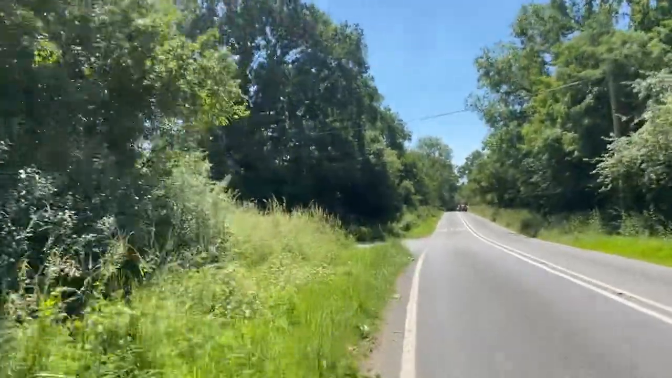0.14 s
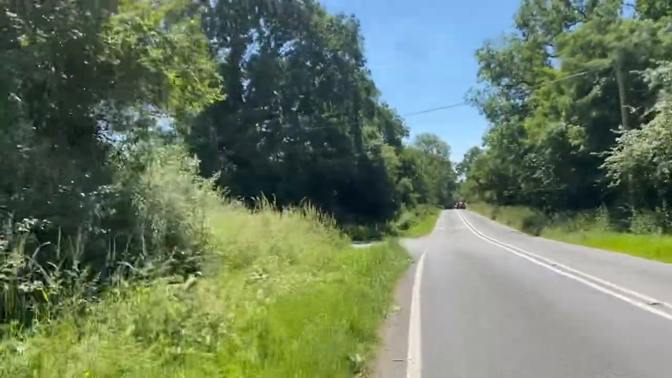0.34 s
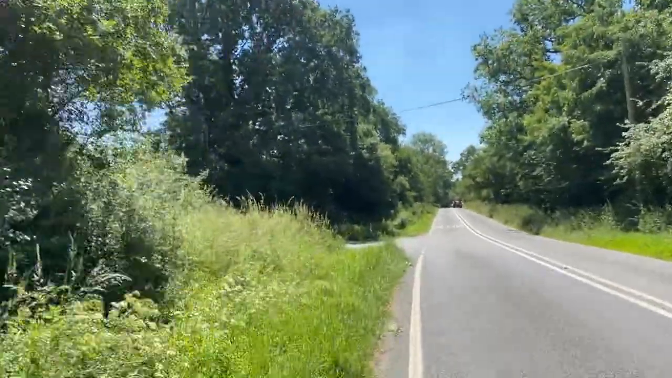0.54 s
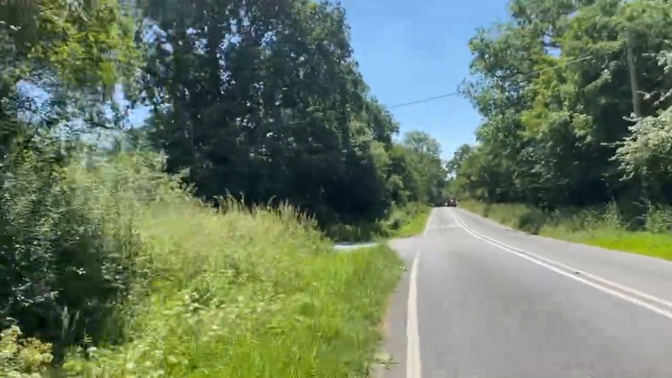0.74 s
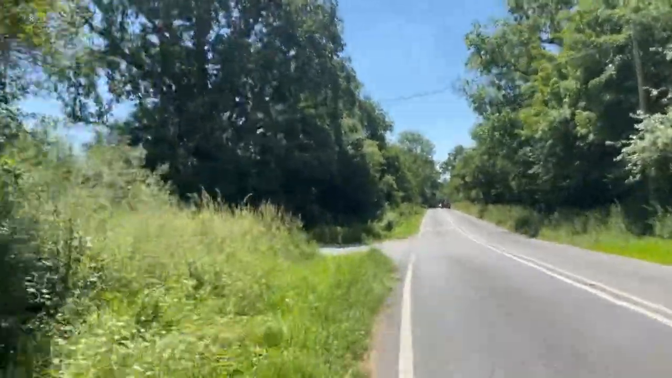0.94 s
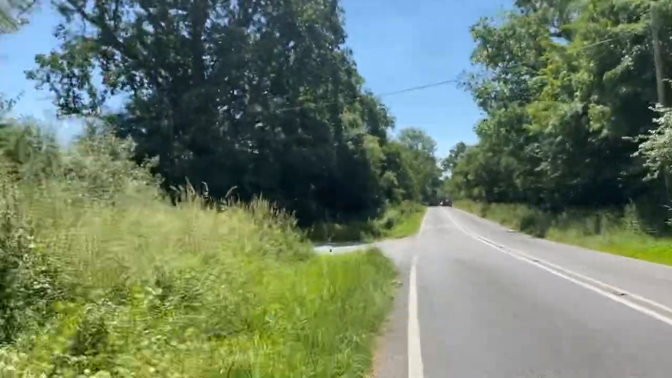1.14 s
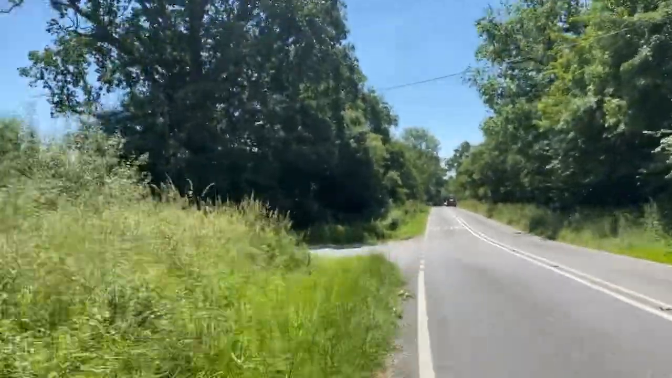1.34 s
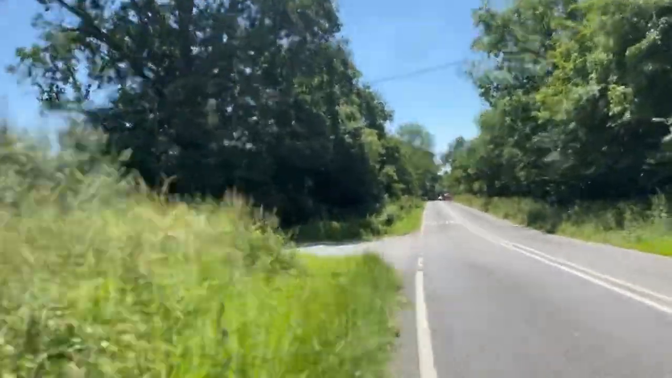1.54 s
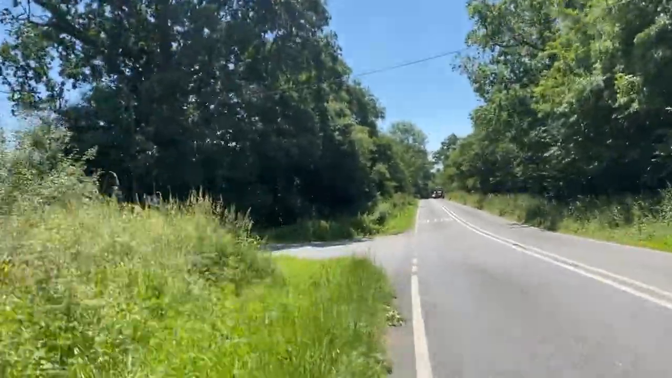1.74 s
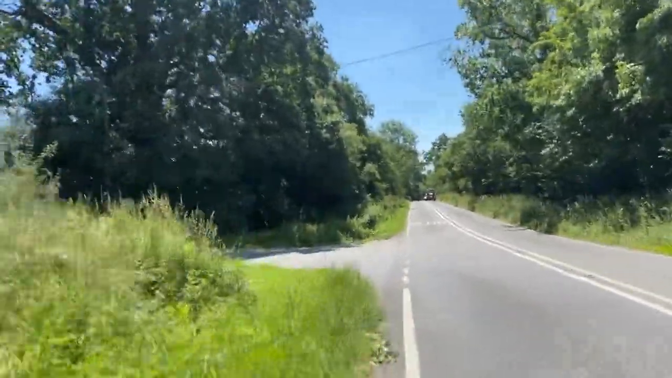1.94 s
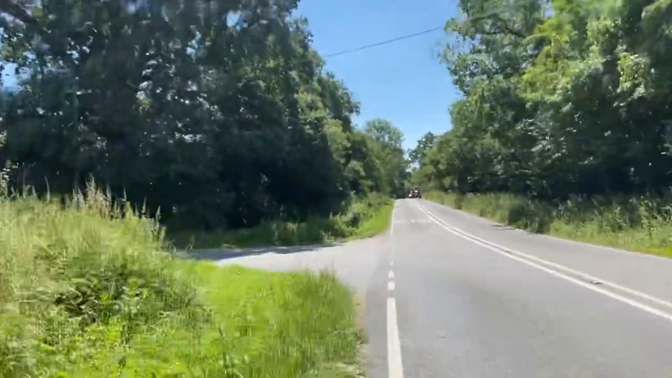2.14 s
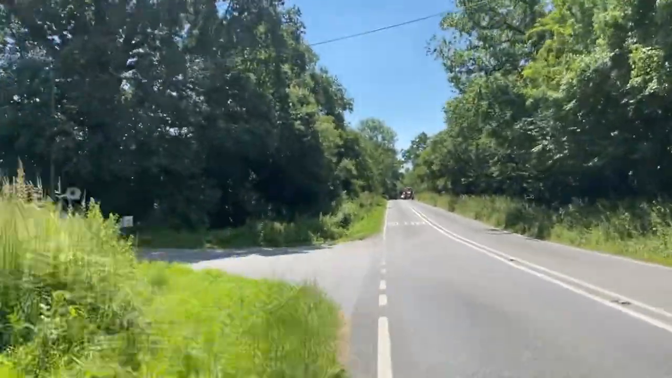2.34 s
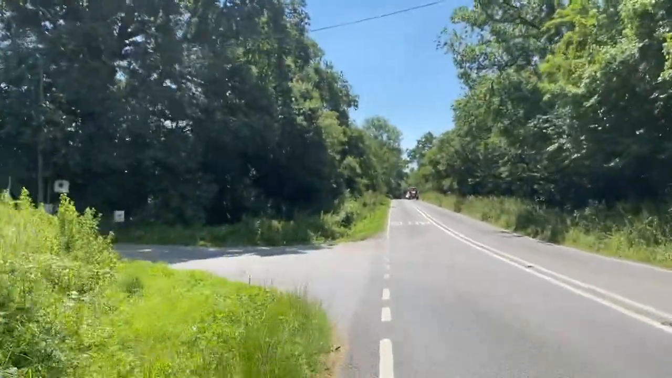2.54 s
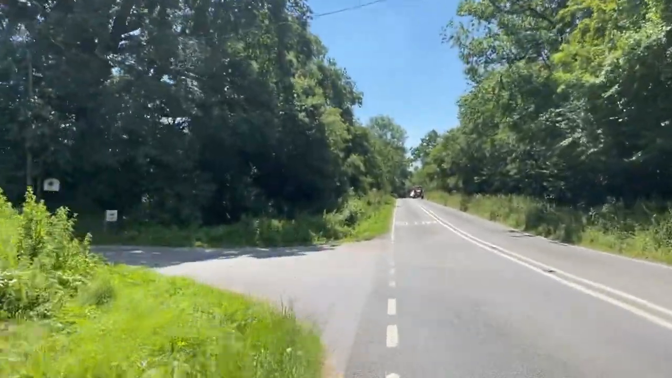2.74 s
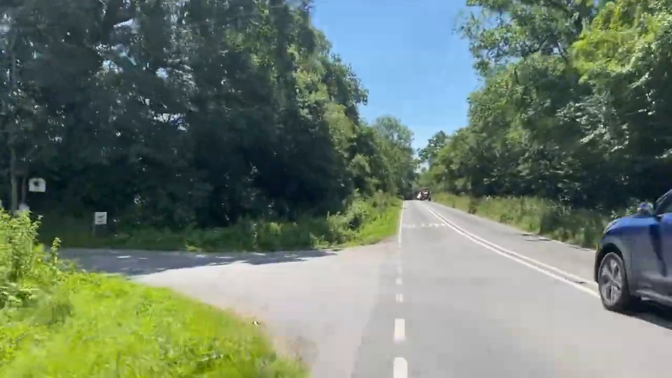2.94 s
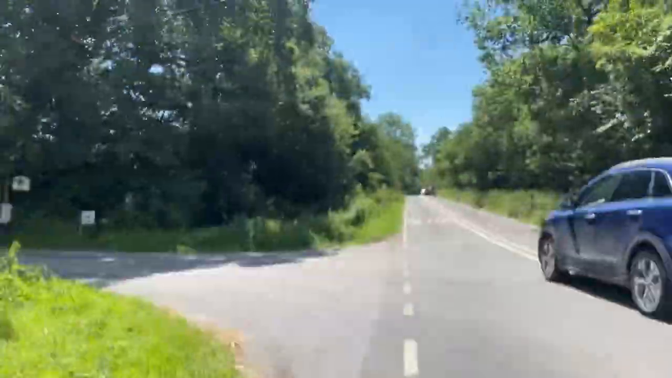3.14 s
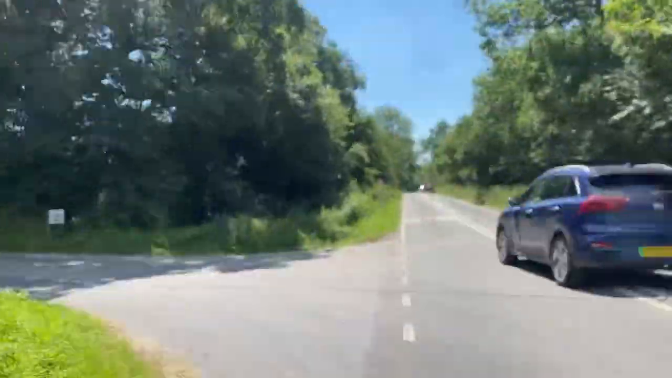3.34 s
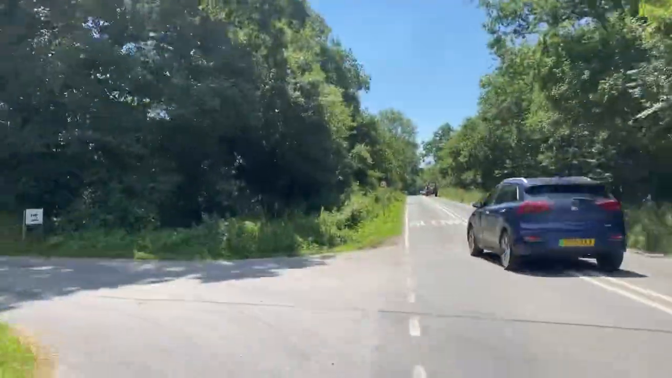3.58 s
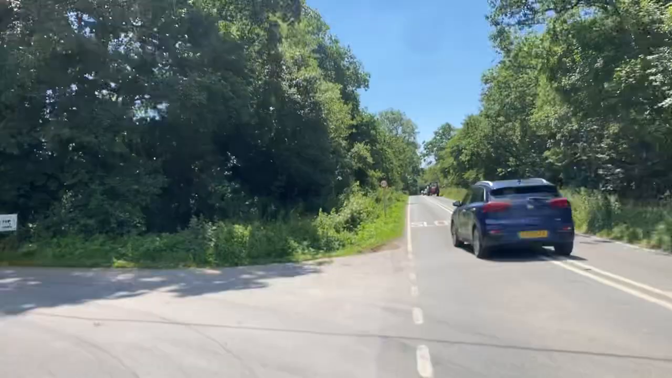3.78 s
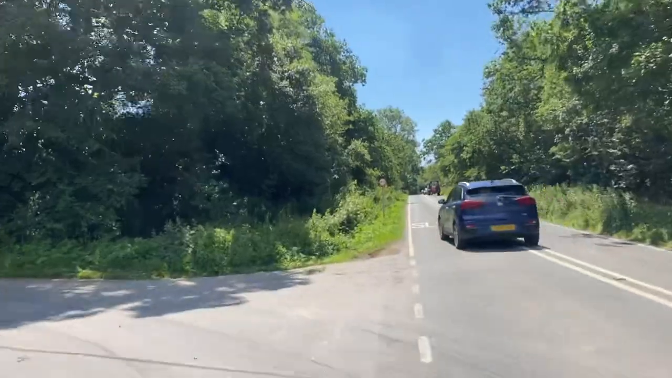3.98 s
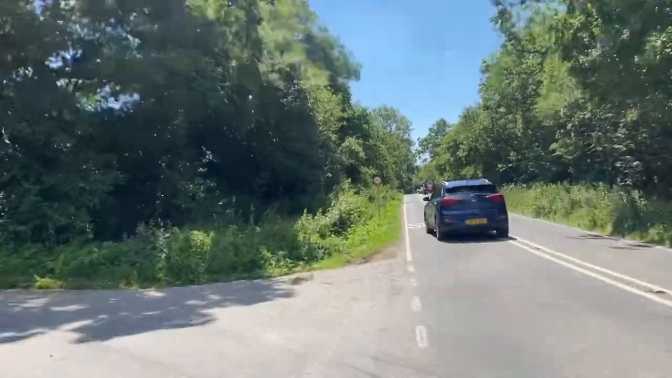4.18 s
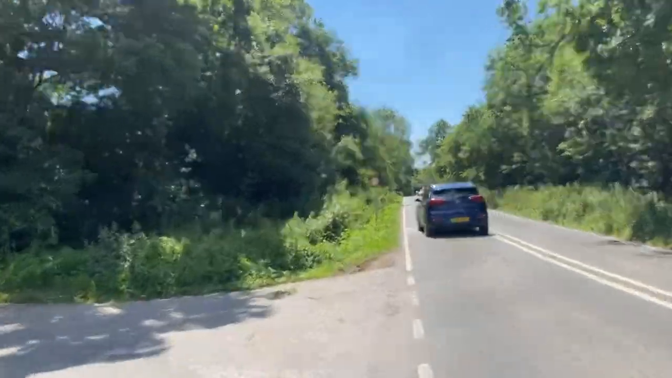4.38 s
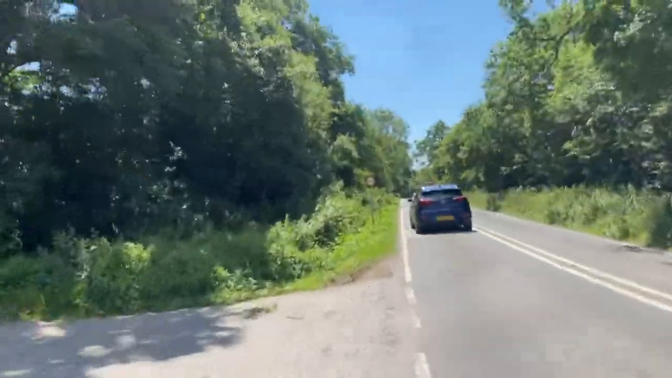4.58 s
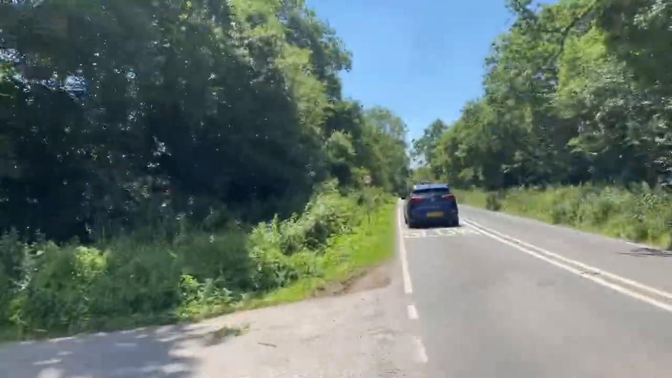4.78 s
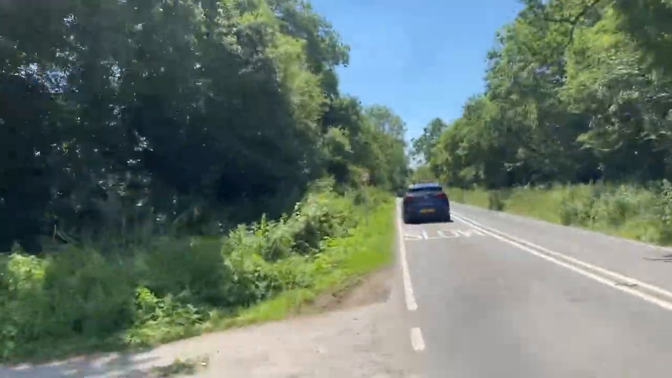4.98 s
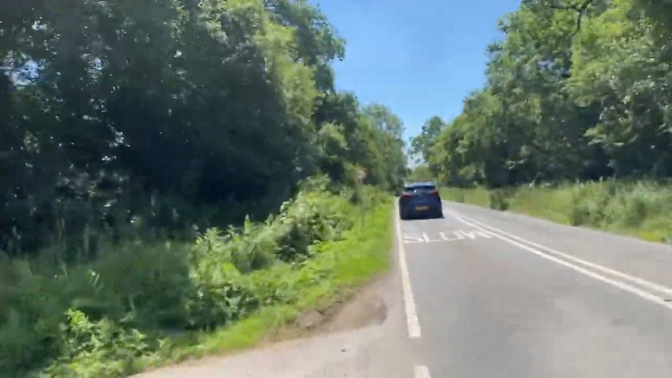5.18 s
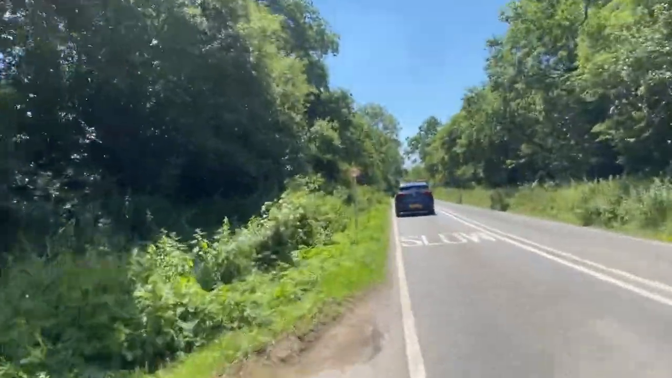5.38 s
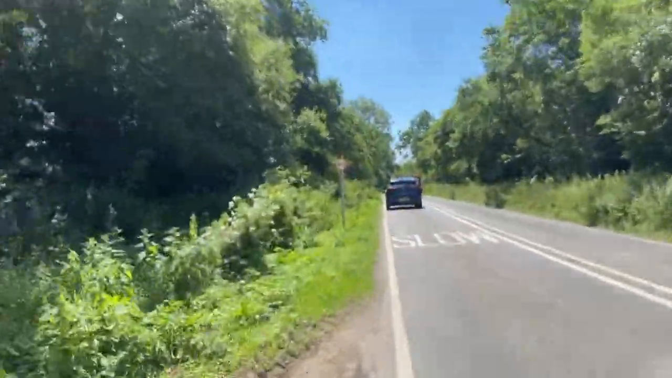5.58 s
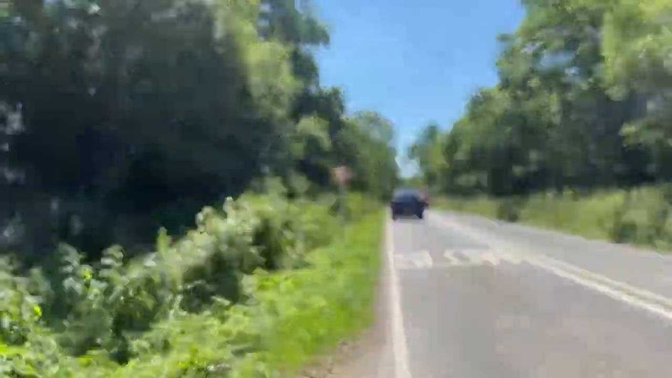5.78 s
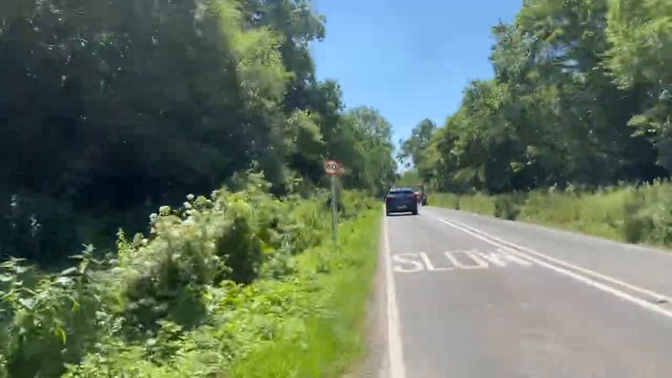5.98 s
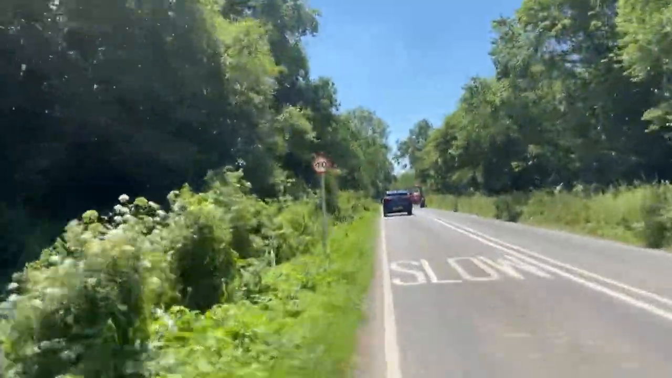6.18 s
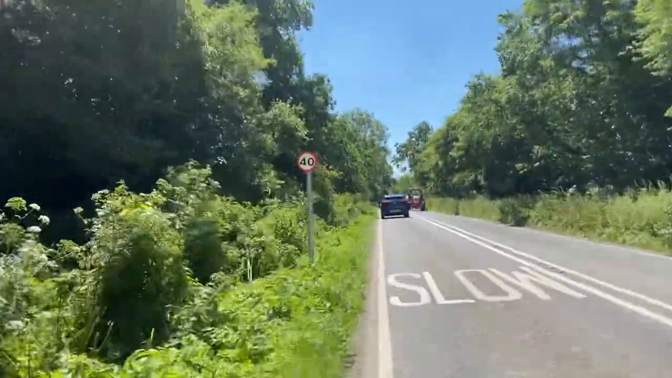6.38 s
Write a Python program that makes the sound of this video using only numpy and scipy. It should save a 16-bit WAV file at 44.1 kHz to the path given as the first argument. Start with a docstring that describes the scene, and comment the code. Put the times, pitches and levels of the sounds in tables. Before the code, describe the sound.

A stereo microphone on a moving bicycle, on an open country road. At first there is the quiet, steady rush of the bicycle's tyres, a little low wind, and a car's tyre roar growing from behind on the right. Faint bright ticks of a loose part begin around 0.6 s, and dull thuds land near 1.65 and 1.84 s. The car draws level at about 2.3 s, its broadband roar full and increasingly hissy, while deep, lumpy wind buffeting peaks around 2.4 s. From 2.9 to 3.5 s thumps and a dense rattle of clicks follow as the tyres pull ahead, moving towards the centre with a broad tread note near 1 kHz. The roar eases gradually. Gusts thump near 4.07 and 5.05-5.25 s; ticks cluster again at 5.4-5.9 s, a harder knock rings at 6.05 s, and wind rises slightly at the end.

```python
"""On a country road a car overtakes a bicycle, heard from the bicycle.
Its tyres are coloured noise: they roar up from behind on the right, hiss alongside and recede ahead
with a broad tread note near 1 kHz. The bicycle's own tyres are a steady, quiet noise.
Air buffets the microphone ports as lumpy noise, strongest around the car's pass, with thumps as short swings.
Loose parts of the bicycle rattle over bumps: small clicks that ring resonances."""
import sys
import numpy as np
from scipy import signal
from scipy.fft import rfft, irfft, next_fast_len
from scipy.io import wavfile
from scipy.ndimage import uniform_filter1d

SR = 44100
rng = np.random.default_rng(int(sys.argv[2]) if len(sys.argv) > 2 else 0)


def transcribe(signal):
    """Save signal, clipped to [-1, 1], as a 16-bit WAV file at the path in sys.argv[1]."""
    frames = np.atleast_2d(signal).T
    limited = np.clip(frames, -1, 1)
    pcm = np.round(limited * 32767).astype(np.int16)
    wavfile.write(sys.argv[1], SR, pcm)


N = 283122
TIME = np.arange(N) / SR
FRAME = 1024   # samples in one short slice of sound
OVERLAP = FRAME * 3 // 4
FRAME_HZ, FRAME_S, _ = signal.stft(TIME, SR, nperseg=FRAME, noverlap=OVERLAP)
HZ_COLUMN = FRAME_HZ[:, None]


def from_db(db):
    """Decibels to gain."""
    return 10 ** (np.asarray(db) / 20)


def rms_one(x):
    """Scale to unit power."""
    return x / np.sqrt(np.mean(x ** 2) + 1e-20)


def in_time(rows, at):
    """Read each column of a time curve at the given times."""
    s, *columns = np.transpose(rows)
    return [np.interp(at, s, column) for column in columns]


def at_hz(points, hz):
    """Read a spectrum with straight lines between its points on a log-frequency axis."""
    known_hz, values = np.transpose(points)
    return np.interp(np.log(hz + 1), np.log(known_hz), values)


def by_frequency(table):
    """Read each column of a table at the frame frequencies."""
    rows = np.array(table)
    return np.array([at_hz(rows[:, [0, k]], HZ_COLUMN) for k in range(1, rows.shape[1])])


def shares(control, marks):
    """Cross-fade weights of a control between its marks."""
    return [np.interp(control, marks, one) for one in np.eye(len(marks))]


def blend(parts, weights):
    """Mix several values or spectra by weights that change in time."""
    return sum(weight * part for weight, part in zip(weights, parts))


def panned(left_right_db):
    """Left and right gains of constant total power; positive is louder on the left."""
    gains = from_db([left_right_db / 2, -left_right_db / 2])
    return gains / np.sqrt(np.mean(gains ** 2, axis=0))


def drift(rate):
    """Smooth random wandering of spread 1 that changes about rate times a second."""
    hz = np.fft.rfftfreq(N, 1 / SR)
    spectrum = rfft(rng.standard_normal(N)) / (1 + (hz / rate) ** 2)
    return rms_one(irfft(spectrum, N))


def pair(mid, side, likeness):
    """Mix two unrelated noises into a left and a right of a given likeness."""
    likeness = np.clip(likeness, 0, .99)
    mid = np.sqrt(1 + likeness) * mid
    side = np.sqrt(1 - likeness) * side
    return np.array([mid + side, mid - side]) / np.sqrt(2)


def coloured(spectrum, likeness):
    """Stereo noise with a given spectrum, scaled to unit power."""
    size = next_fast_len(N)
    gain = from_db(at_hz(spectrum, np.fft.rfftfreq(size, 1 / SR)))
    mid, side = irfft(rfft(rng.standard_normal((2, size))) * gain, size)[:, :N]
    return rms_one(pair(mid, side, likeness))


# the pass: the car draws level while it cuts back into line ahead
ABREAST_S, OVERTAKE_M_PER_S = 2.276, 3.86
CAR_SIDE_M = 2.02   # the car's middle from the bicycle, before it cuts in
CUT_IN_S, CUT_IN_TAKES_S = 2.25, 2.35


def car_position(at):
    """Metres the car is ahead, and the sine of its bearing: 0 = in line with the road, 1 = abreast."""
    ahead_m = OVERTAKE_M_PER_S * (at - ABREAST_S)
    cut_in = np.clip((at - CUT_IN_S) / CUT_IN_TAKES_S, 0, 1)
    side_m = CAR_SIDE_M * np.cos(np.pi / 2 * cut_in) ** 2
    return ahead_m, side_m / np.hypot(side_m, ahead_m)


WHEEL_SIDE_M, WHEELBASE_M = 1.73, 3.34   # near wheels from the bicycle; axle to axle
# the wedge between tyre and road beams the roar backwards; the width is a sine of the angle
HORN_DB, HORN_WIDTH = 5.5, 0.16
FAR_BEHIND_DB_PER_M = 0.63   # the rider's body screens the approaching car


def travel_db(ahead_m, sideways):
    """Front and rear tyres each fall off with distance, and beam their roar straight back."""
    power = sum(1 / (WHEEL_SIDE_M ** 2 + (ahead_m + end * WHEELBASE_M / 2) ** 2) for end in (-1, 1))
    horn_db = HORN_DB * np.exp(-(sideways / HORN_WIDTH) ** 2) * (ahead_m > 0)
    return 10 * np.log10(power) + horn_db + FAR_BEHIND_DB_PER_M * np.minimum(ahead_m, 0)


def band_power(gain, low_hz, high_hz):
    """Power that unit white noise keeps in a band, frame by frame."""
    in_band = (FRAME_HZ > low_hz) & (FRAME_HZ < high_hz)
    return np.sum(gain[in_band] ** 2, axis=0) / len(FRAME_HZ)


# shape of the tyre noise from the car's nose, flank and tail, before levels are set:
# columns pitch_hz, relative_level_db (per Hz)
NOSE_SPECTRUM = [(30, -38), (100, -12), (240, 14), (370, 6), (500, 7.5), (700, 3.5), (1000, 4), (1300, -1),
                 (1700, -8), (2200, -27.5), (3200, -31.5), (5400, -43.5), (8400, -49.5), (11300, -46),
                 (13000, -60), (16000, -76)]
FLANK_SPECTRUM = [(30, -3), (100, -1), (240, 5), (450, -1.5), (780, 3.5), (1000, 0), (1270, -9.5),
                  (1800, -10.5), (2200, -12), (3000, -20.5), (4500, -29.5), (5700, -35), (7200, -36),
                  (8400, -35), (10700, -29.5), (12000, -43), (13000, -53), (16000, -69)]
TAIL_SPECTRUM = [(100, 1.5), (450, 6), (700, -12.5), (1050, -3), (1400, -14.5), (1900, -13.5),
                 (2600, -20.5), (3500, -28), (4700, -33.5), (6000, -44), (8400, -48), (10700, -45),
                 (12000, -55), (13000, -61), (16000, -77)]
# tread resonances heard from behind the car: columns pitch_hz, width_hz, lift_db (it wavers around this)
TREAD_NOTES = [(737, 192, 17.5), (1021, 158, 12), (1393, 192, 15), (1697, 68, 10)]


def tyre_colour(aspect, hiss_db, wander_db):
    """Gain by frequency and time: the colour turns with the car, and the tread notes stand out behind it."""
    tread_db = 0
    for centre_hz, width_hz, lift_db in TREAD_NOTES:
        wavering_db = wander_db * np.interp(FRAME_S, TIME, drift(40.0))
        tread_db = tread_db + (lift_db + wavering_db) / (1 + (2 * (HZ_COLUMN - centre_hz) / width_hz) ** 2)
    nose_db, flank_db = at_hz(NOSE_SPECTRUM, HZ_COLUMN), at_hz(FLANK_SPECTRUM, HZ_COLUMN)
    tail_db = at_hz(TAIL_SPECTRUM, HZ_COLUMN) + tread_db
    db = blend([nose_db, flank_db, tail_db], aspect)
    # air pumped out of the tread grooves sets how strong the hiss is over the roar
    shape = from_db(db)
    hiss_now_db = 10 * np.log10(band_power(shape, 2300, 4200) / band_power(shape, 700, 1800))
    hiss_share = at_hz([(1100, 0), (2200, 0.76), (5000, 1.0), (11000, 1.0)], HZ_COLUMN)
    gain = from_db(db + (hiss_db - hiss_now_db) * hiss_share)
    return gain / np.sqrt(band_power(gain, 700, 1800))


# bands that grow louder or softer, and change between left and right, as the car passes:
# columns ahead_m (car's place at the peak), reach_m, pitch_hz, width_octaves, level_db,
# left_right_db, left_lead_radians
PASSING_BANDS = [(-1, 0.62, 1430, 0.53, 6.5, 1, 0.073), (-1.5, 0.9, 2700, 0.47, 3, -6, -0.6),
                 (0.5, 0.52, 3000, 0.35, 2.5, -13, -0.074), (1, 1.5, 1200, 0.49, 2.5, 3, -0.64),
                 (1, 0.21, 1350, 0.23, -8, 4, 0.028), (1.4, 1.15, 2200, 0.72, -5.5, 0.5, 0.82),
                 (3, 1.3, 1980, 0.12, 3.5, 0.5, 0.31)]


def passing_bands(ahead_m):
    """Level, left-right difference and left lead of the bands that change as the car passes."""
    total = 0
    for at_m, reach_m, hz, octaves, *effects in PASSING_BANDS:
        in_place = ((ahead_m - at_m) / reach_m) ** 2
        in_pitch = (np.log2((HZ_COLUMN + 1) / hz) / octaves) ** 2
        total = total + np.multiply.outer(effects, np.exp(-in_place - in_pitch))
    return total


NOSE_M, TAIL_M = 3.4, 5.16   # this far behind only its nose is heard, this far ahead only its tail
FLANK_M = 0.87   # within this distance either way it shows its full flank
# SHADOW_DB is a left-right difference
SHADOW_HZ, SHADOW_SINK_OCTAVES_PER_M, SHADOW_OCTAVES, SHADOW_DB = 1950, 0.145, 0.2, -5


def shadow_db(ahead_m):
    """The shadow on the left port is a notch that sinks in pitch as the car slides past."""
    octaves = np.log2((HZ_COLUMN + 1) / SHADOW_HZ) + SHADOW_SINK_OCTAVES_PER_M * ahead_m
    alongside = np.interp(ahead_m, [-FLANK_M, 0, TAIL_M, 2 * TAIL_M], [0, 1, 1, 0])
    return SHADOW_DB * alongside * np.exp(-(octaves / SHADOW_OCTAVES) ** 2)


HISS_RISE_DB_PER_M = 4.5   # the tyres throw their hiss backwards, so it grows along the flank
PORT_LAG_S = 0.00029   # the left port hears a car abreast this much later
# starting roar of one tyre at 1 m, before all later level changes: nose_db, flank_db, tail_db
ROAR_DB = [-24, -19.5, -24]
# starting hiss relative to the roar, before later level changes: nose_db, flank_db, tail_db
HISS_OVER_ROAR_DB = [-21, -20.5, -15]
# small changes of the roar's level after the car has passed (the first one also holds before):
# columns time_s, change_db
ROAR_LEVEL = [(2.8, -1.8), (3.25, -2.5), (3.55, -1), (3.9, 0.5), (4.2, 0.2), (4.45, -1.5), (4.75, 1),
              (5.2, 0.4)]
# how alike the tyre noise is left and right: columns pitch_hz, likeness_0_to_1 (held to 0.99 at most)
TYRE_LIKENESS_BY_HZ = [(100, 0.46), (600, 0.89), (1000, 0.97), (1400, 0.86), (2400, 1), (3500, 0.52),
                       (6000, 0.19), (10500, 0.073)]
# left-right level difference, before passing bands and shadow: columns pitch_hz, nose_db, flank_db, tail_db
SIDE_SHADE = [(200, 0, -9, 6), (537, -9.5, -4, -6.5), (770, -9, -2.5, -8.5), (1070, -20, -5.5, -10.5),
              (1280, -8, -7, -6.5), (1440, -4.5, -4, -9.5), (1770, 0, -3, -6), (2200, -2, -2, -1),
              (3280, -0.5, 4.5, 1.5), (4600, -3, 1, 2), (8000, -4, 3.5, 4)]
# phase by which the left port leads, besides the port lag and the passing bands:
# columns pitch_hz, in_line_radians, slanting_radians, abreast_radians
LEFT_LEAD = [(102, 0.33, 1, 0.75), (300, -0.14, -0.56, -1.73), (600, -0.78, -2.1, -1.5),
             (806, -0.51, -1.3, -1.7), (950, 0.071, -1.4, -0.69), (1340, -0.12, -0.42, -0.69),
             (1520, 0.017, 0.66, -0.1), (1990, 0.05, 0.84, -0.13), (2660, -0.15, 0.81, -0.35),
             (3900, 0.62, -0.21, 0.87), (10500, -0.94, -0.86, -0.67)]


def car(slant, grain_db):
    """Tyre noise takes its level, colour and left-right timing from where the car is."""
    ahead_m, sideways = car_position(FRAME_S)
    nose, front_door, rear_door, tail = shares(ahead_m, [-NOSE_M, -FLANK_M, FLANK_M, TAIL_M])
    aspect = [nose, front_door + rear_door, tail]
    change_db, = in_time(ROAR_LEVEL, FRAME_S)
    roar_db = blend(ROAR_DB, aspect) + travel_db(ahead_m, sideways) + change_db
    # taking the change off again keeps it out of the hiss
    flank_hiss_db = HISS_RISE_DB_PER_M * FLANK_M * (rear_door - front_door)
    hiss_db = blend(HISS_OVER_ROAR_DB, aspect) - change_db + flank_hiss_db
    # patches of coarser and smoother asphalt make the noise flicker
    noise = rng.standard_normal((2, N)) * rms_one(from_db(grain_db * drift(9.0)))
    mid, side = signal.stft(noise, SR, nperseg=FRAME, noverlap=OVERLAP)[2]
    band_db, band_left_right_db, band_lead = passing_bands(ahead_m)
    left_right_db = blend(by_frequency(SIDE_SHADE), aspect) + shadow_db(ahead_m) + band_left_right_db
    likeness = at_hz(TYRE_LIKENESS_BY_HZ, HZ_COLUMN)
    left, right = pair(mid, side, likeness) * panned(left_right_db)
    lead = blend(by_frequency(LEFT_LEAD), shares(sideways, [0, slant, 1]))
    lead = lead - 2 * np.pi * HZ_COLUMN * PORT_LAG_S * sideways
    ports = np.array([left * np.exp(1j * (lead + band_lead)), right])
    ports = ports * tyre_colour(aspect, hiss_db, wander_db=1.1) * from_db(roar_db + band_db)
    return signal.istft(ports, SR, nperseg=FRAME, noverlap=OVERLAP)[1][:, :N]


# the bicycle's own tyres: columns pitch_hz, relative_level_db (per Hz)
ROLLING_SPECTRUM = [(100, -7), (500, -2), (1000, 7.5), (1650, 1), (2200, -4.5), (3500, -15), (6000, -22.5),
                    (8300, -21.5), (11000, -22.5), (12200, -26), (13000, -44), (16000, -55)]


def rolling():
    """The bicycle's tyres on the road make a steady, quiet noise."""
    return from_db(-47.5) * coloured(ROLLING_SPECTRUM, likeness=0.42)


# slowly changing strength of the wind over the ports, strongest around the car's pass;
# wind() trims both levels: columns time_s, buffeting_db, flutter_db
AIR_FLOW = [(0, -44, -36), (0.8, -34.5, -33.5), (1.5, -34, -40), (1.95, -25, -25.5), (2.35, -21.5, -24.5),
            (2.75, -22, -17), (3.25, -23.5, -32), (4.35, -25, -37), (4.65, -31.5, -41), (5.5, -34, -37),
            (6.42, -26, -26)]
# gusts on top of that wind, trimmed alike: columns time_s, buffeting_db, flutter_db
GUST_PEAKS = [(0.32, -34, -39), (0.45, -38, -36), (1.33, -45, -27), (1.67, -29, -45), (1.87, -25, -19),
              (2.2, -19.5, -27), (2.37, -13, -24), (2.509, -17.5, -32), (2.68, -19.5, -43),
              (2.949, -17.5, -20), (3.088, -23, -26), (3.419, -26, -28), (3.9, -42, -20.5),
              (4.069, -20, -27), (4.28, -24, -46), (4.39, -22.5, -26.5), (5.04, -23, -33),
              (5.238, -32, -19.5), (5.57, -40, -24), (5.716, -27, -22.5), (5.85, -39, -31),
              (6.22, -23, -23), (6.35, -27.5, -42)]
# time each side of a gust's peak in which its power falls to about a third: buffeting_s, flutter_s
GUST_FALL_S = [0.03, 0.028]


def air_flow():
    """Strength of buffeting and of flutter: the slowly changing wind and the gusts add in power."""
    power = from_db(in_time(AIR_FLOW, TIME)) ** 2
    for s, *levels_db in GUST_PEAKS:
        near = np.abs(TIME - s) < .2
        for kind, (db, fall_s) in enumerate(zip(levels_db, GUST_FALL_S)):
            power[kind, near] += from_db(db) ** 2 * np.exp(-((TIME[near] - s) / fall_s) ** 2)
    return np.sqrt(power)


def evened(x, seconds):
    """Take the slow swells out of a noise and keep its fast lumps."""
    local_power = uniform_filter1d(np.mean(x ** 2, axis=0), int(seconds * SR) + 1)
    return x / np.sqrt(local_power + 1e-9)


# the deep buffeting and the higher flutter: columns pitch_hz, relative_level_db (per Hz)
BUFFET_SPECTRUM = [(12, -60), (22, -35), (42, -4.5), (65, 4.5), (167, -4), (250, -10), (330, -28.5),
                   (550, -70)]
FLUTTER_SPECTRUM = [(20, -40), (70, -10.5), (130, -1.5), (180, -0.5), (240, -7), (330, -11), (450, -9.5),
                    (700, -23.5), (1400, -39), (8000, -81)]


def wind(buffet_db, flutter_db, lumpy_db, crossing_s):
    """Turbulence presses on both ports: a deep buffeting, and a flutter that comes in short lumps."""
    buffet_strength, flutter_strength = air_flow()
    buffet = evened(coloured(BUFFET_SPECTRUM, likeness=0.62), seconds=0.095)
    lumps = from_db(lumpy_db * drift(56))
    flutter = evened(coloured(FLUTTER_SPECTRUM, likeness=0.57) * lumps, seconds=0.076)
    flutter = flutter * panned(-0.63)[:, None]
    left, right = (from_db(buffet_db) * buffet_strength * buffet
                   + from_db(flutter_db) * flutter_strength * flutter)
    # air pushed aside by the car crosses the right port first
    sideways = car_position(TIME)[1]
    return np.array([np.interp(TIME - crossing_s * sideways, TIME, left), right])


# short low thumps, from air on the ports or jolts of the bicycle:
# columns time_s, level_db (before the shared lift and panning), pitch_hz, left_right_db
THUMPS = [(.305, -22.5, 165, 5), (0.446, -28, 149, 0), (0.996, -23.5, 300, 3), (1.322, -20, 241, 0.5),
          (1.6498, -15, 600, -16), (1.847, -19, 393, -20), (2.342, -31, 121, 0), (2.908, -16, 400, -12),
          (2.922, -12, 674, -23), (3.046, -14.5, 574, 5), (3.07, -12, 600, 13), (4.065, -13, 135, 1),
          (5.0495, -16.5, 209, 2), (5.228, -24, 169, -7), (5.253, -13, 200, -1), (5.5196, -21.5, 950, -1.5),
          (5.712, -23, 252, 6), (5.797, -21.5, 380, 0), (5.857, -22, 154, 2), (5.891, -24, 436, 6),
          (6.107, -24, 615, 1), (6.205, -18.5, 266, 12), (6.346, -24.5, 130, 0)]


def thumps(level_db, cycles):
    """Each thump swings the pressure once or twice under a smooth rise and fall."""
    out = np.zeros((2, N))
    for s, db, hz, left_right_db in THUMPS:
        near = np.abs(TIME - s) < .05
        turn = (TIME[near] - s) * hz
        swing = np.exp(-(turn / cycles) ** 2) * np.sin(2 * np.pi * (turn + rng.random()))
        out[:, near] += from_db(db + level_db) * panned(left_right_db)[:, None] * swing
    return out


def resonate(x, modes):
    """Parallel resonances of (Hz, width Hz, dB), signs alternating."""
    out = 0
    for k, (hz, width, db) in enumerate(modes):
        r = np.exp(-np.pi * width / SR)
        poles = [1, -2 * r * np.cos(2 * np.pi * hz / SR), r * r]
        out = out + (-1) ** k * from_db(db) * signal.lfilter([1 - r, 0, r - 1], poles, x + 1e-18)
    return out


def rattle(hits, modes, level_db, grit, contact_s, bounce_db, soft_hz):
    """Each touch is a click, a gritty after-contact and a small bounce that ring the part's modes."""
    out, age = np.zeros((2, N + 2 * FRAME)), TIME[:2 * FRAME]
    softness = signal.butter(4, soft_hz, fs=SR, output="sos")
    for s, db in hits:
        scrape = pair(*rng.standard_normal((2, len(age))), likeness=0.29)
        force = (age == 0) + grit * np.exp(-age / contact_s) * scrape
        bounce_gain = from_db(bounce_db + rng.normal(0, 3.5))
        bounce_samples = int(rng.uniform(.001, 0.0053) * SR)
        force = force + bounce_gain * np.roll(force, bounce_samples, axis=1)
        # every touch excites each mode a little differently
        struck = [(hz, width, mode_db + rng.normal(0, 2.8)) for hz, width, mode_db in modes]
        sound = signal.sosfilt(softness, resonate(force, struck))
        peak = np.abs(signal.hilbert(sound)).max(axis=1, keepdims=True)
        start = int(s * SR)
        out[:, start:start + len(age)] += from_db(db + level_db) * sound / peak
    return out[:, :N]


# after each tick the part falls back once, about this much later and weaker
REBOUND_S, REBOUND_DB = 0.0076, -9
# clear ticks of a loose part on the bicycle: columns time_s, level_db (peak, before the shared lift)
TICK_HITS = [(0.632, -45.5), (0.639, -38.5), (0.7584, -42), (0.809, -45), (0.8347, -38), (0.8503, -41),
             (0.8804, -42), (1.151, -45), (1.3554, -40.5), (1.5053, -40), (1.675, -41), (1.784, -39.5),
             (1.8274, -36), (1.904, -41), (2.9836, -36), (3.003, -30), (3.011, -33), (3.032, -31),
             (3.035, -31), (3.041, -33), (3.059, -32), (3.066, -29), (3.0856, -37), (3.1842, -37),
             (3.213, -44), (3.2313, -39), (3.277, -36), (3.3688, -42), (3.4634, -39), (4.55, -42),
             (4.816, -43), (4.9563, -45.5), (5.3828, -38), (5.411, -36), (5.453, -45), (5.5147, -44),
             (5.57, -32.5), (5.6194, -36), (5.6217, -34), (5.595, -48), (5.6436, -40), (5.69, -46),
             (5.67, -38), (5.672, -33.5), (5.7178, -35), (5.7287, -39), (5.761, -33.5), (5.769, -51),
             (5.7853, -42), (5.81, -34.5), (5.863, -46), (6.0825, -45)]


def touches():
    """Every touch of the loose part as (s, dB): the ticks and their uneven rebounds."""
    rebounds = []
    for s, db in TICK_HITS:
        later_s = REBOUND_S * rng.uniform(0.37, 1.2)
        rebounds.append((s + later_s, db + REBOUND_DB + rng.normal(0, 2.3)))
    return list(TICK_HITS) + rebounds


# what the loose part rings with: columns pitch_hz, width_hz, strength_db (varied at each touch)
TICK_RESONANCES = [(2860, 1600, -8.5), (4660, 740, 2.5), (5840, 470, 0), (8400, 910, 6.5),
                   (11030, 980, -1.5), (13900, 3100, -13)]


def ticks():
    """A loose part rattles with short, bright rings, a little to the left."""
    left, right = rattle(touches(), TICK_RESONANCES, level_db=14.5, grit=.12, contact_s=.0007,
                         bounce_db=-16, soft_hz=16000)
    return np.array([left, np.roll(right, 3)])   # right comes 3 samples later


# dull thuds of the bicycle over the road: columns time_s, level_db (peak, before panning)
BUMP_HITS = [(1.647, -12), (1.6645, -17.5), (1.8415, -17)]
# what they ring with: columns pitch_hz, width_hz, strength_db (varied at each thud)
BUMP_RESONANCES = [(650, 230, 7), (1500, 360, -5.5), (3550, 260, -23), (4400, 360, -28)]


def bumps():
    """The bicycle thuds dully over the road, louder on the right."""
    thuds = rattle(BUMP_HITS, BUMP_RESONANCES, level_db=0, grit=.08, contact_s=.001,
                   bounce_db=-9, soft_hz=3800)
    return thuds * panned(-11)[:, None]


# a harder knock on the frame: columns time_s, level_db (peak)
KNOCK_HITS = [(6.0532, -21)]
# what it rings with: columns pitch_hz, width_hz, strength_db (varied at each knock)
KNOCK_RESONANCES = [(1520, 130, 1), (2300, 440, 1), (2750, 300, -11)]


def knocks():
    """A harder knock rings the bicycle frame."""
    return rattle(KNOCK_HITS, KNOCK_RESONANCES, level_db=0, grit=.06, contact_s=.001,
                  bounce_db=-20, soft_hz=3200)


def scene():
    """The car, the air and the bicycle added together."""
    tyres = car(slant=0.59, grain_db=1.18)
    own_tyres = rolling()
    air = wind(buffet_db=-1.0, flutter_db=-3.0, lumpy_db=5.0, crossing_s=0.00048)
    short_thumps = thumps(level_db=3.0, cycles=0.73)
    return tyres + own_tyres + air + short_thumps + ticks() + bumps() + knocks()


CUTOFF_HZ = 16200   # the filter's stop band begins 800 Hz above this
# the recorder feeds the left port's treble to the right channel too:
# columns pitch_hz, share_0_to_1, left_lead_radians
TREBLE_SHARING = [(5600, 0.05, -0.5), (6160, 0.95, 2.5), (7200, 0.55, -1.4), (8000, 0.94, -3),
                  (8900, 1, -4), (10400, 0.77, -5.5), (11650, 1, -6), (12700, 0.9, -9.5),
                  (14200, 0.98, -10.5), (15000, 0.85, -10.5)]


def record(dry):
    """In the high treble both channels carry nearly the same signal, turned in phase; the top is cut."""
    hz, rows = np.fft.rfftfreq(N, 1 / SR), np.array(TREBLE_SHARING)
    share = np.clip(at_hz(rows[:, [0, 1]], hz), 0, 1)
    lead = at_hz(rows[:, [0, 2]], hz)
    left, right = rfft(dry)
    right = np.sqrt(1 - share ** 2) * right + share * np.exp(-1j * lead) * left
    heard = irfft([left, right], N)
    top_cut = signal.cheby2(12, 70, CUTOFF_HZ + 800, fs=SR, output="sos")
    return signal.sosfilt(top_cut, heard)


dry = scene()
out = record(dry)
transcribe(out)
```